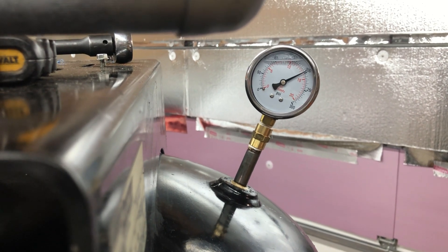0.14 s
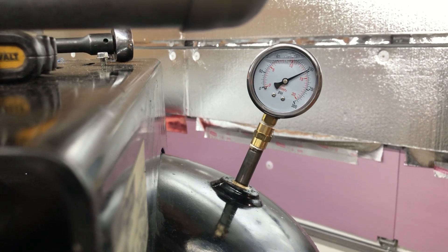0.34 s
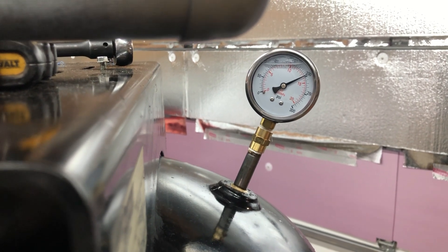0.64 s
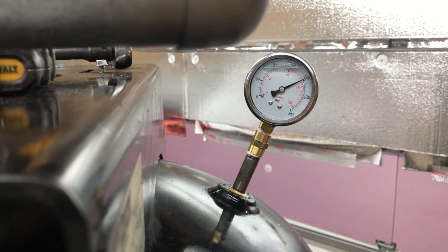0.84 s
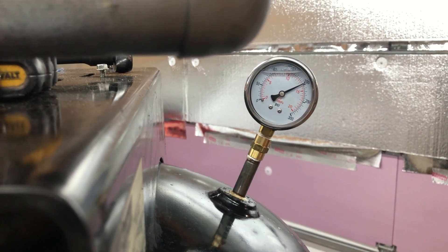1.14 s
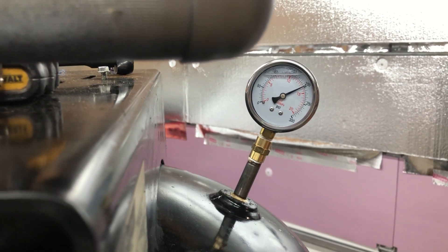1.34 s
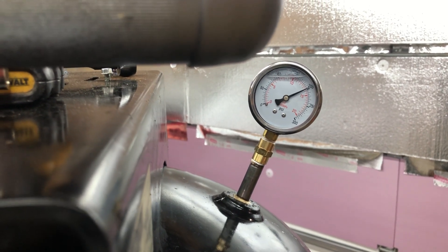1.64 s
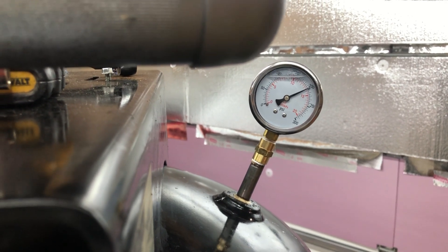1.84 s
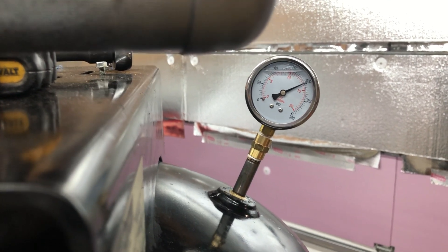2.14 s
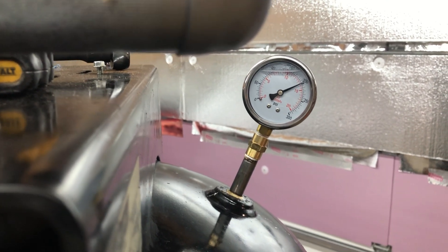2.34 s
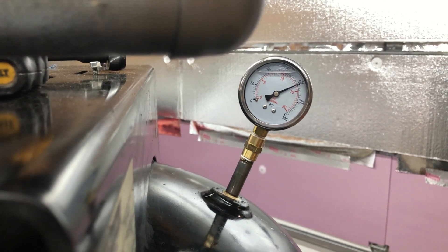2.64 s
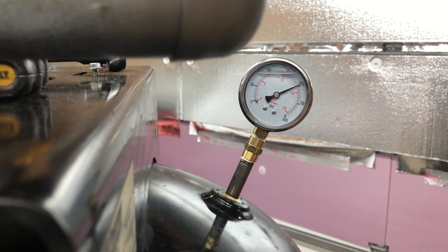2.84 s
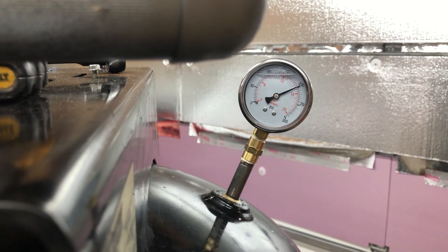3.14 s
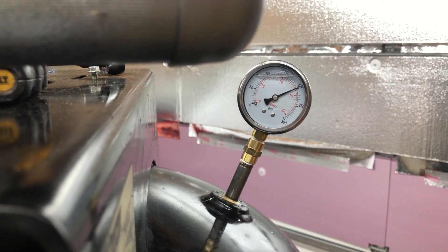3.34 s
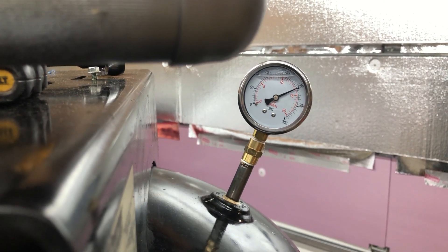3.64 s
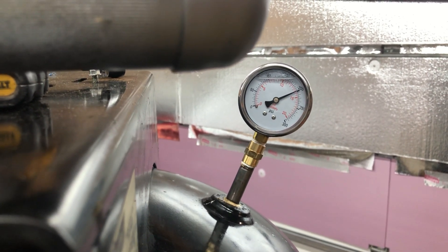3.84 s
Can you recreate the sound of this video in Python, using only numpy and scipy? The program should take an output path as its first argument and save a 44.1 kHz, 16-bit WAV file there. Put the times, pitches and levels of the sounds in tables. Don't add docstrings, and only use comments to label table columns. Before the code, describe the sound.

A cordless grease gun whines and pumps steadily, growling and clicking about every 0.6 seconds.

```python
import sys
import numpy as np
from scipy import signal
from scipy.fft import rfft, irfft
from scipy.io import wavfile
from scipy.ndimage import uniform_filter1d

SR = 44100
rng = np.random.default_rng(int(sys.argv[2]) if len(sys.argv) > 2 else 0)


def file_out(sig):
    cols = np.atleast_2d(sig).T
    lim = np.clip(cols, -1, 1)
    pcm = np.round(lim * 32767).astype(np.int16)
    wavfile.write(sys.argv[1], SR, pcm)


def undo_db(level):
    steps = np.asarray(level, float) / 20
    return 10 ** steps


N = 176400

# start in seconds, peak in dB, extra body in dB.
CLICKS = [(0.0145, -4.5, 1), (0.619, -4.5, 2), (1.2216, -4, 3), (1.8271, -4.5, -1), (2.4328, -6, 1.5),
          (3.039, -4.5, 1), (3.6453, -4.5, 1)]
STROKE_S = .606


def rms_one(x):
    return x / np.sqrt(np.mean(x ** 2) + 1e-20)


def drift(rate_hz):
    r = np.exp(-80 * np.pi * rate_hz / SR)
    slow = signal.lfilter([1], [1, -2 * r, r * r], rng.standard_normal(N // 40 + 2002))
    slow = slow[2000:]
    return np.interp(np.arange(N) / 40, np.arange(len(slow)), rms_one(slow))


def resonance(x, hz, width_hz):
    r = np.exp(-np.pi * width_hz / SR)
    feedback = [1, -2 * r * np.cos(2 * np.pi * hz / SR), r * r]
    return signal.lfilter([(1 - r * r) / 2, 0, (r * r - 1) / 2], feedback, x)


def rattle(bands, bunch):
    hits_per_s = 3500
    struck = (rng.random(N) < hits_per_s / SR) * bunch * undo_db(1.5 * drift(150.0))
    out = 0
    for hz, width_hz, db in bands:
        hits = struck * rng.standard_normal(N) + 1e-18
        once = resonance(hits, hz, width_hz * 1.3)
        out = out + undo_db(db) * rms_one(resonance(once, hz, width_hz * 1.3))
    return out


def tones(orders, turns, load, flutter_db):
    strain_flutter_db = 1.8
    out = 0
    for order, free_db, loaded_db in orders:
        db = free_db + (loaded_db - free_db) * load
        db = db + flutter_db * drift(4.0) + strain_flutter_db * load * drift(51.0)
        out = out + np.sqrt(2) * undo_db(db) * np.sin(2 * np.pi * (order * turns + rng.random()))
    return out


def engaged(load):
    return np.minimum(2.2 * load, 1)


def strokes():
    # seconds after the click, commutator whine in Hz.
    whine = [(0, 3945), (.03, 4036), (.07, 4074), (.2, 4103), (.27, 4124), (.365, 4124), (.39, 4070),
             (.47, 3750), (.51, 3690), (.55, 3730), (.606, 3945)]
    # seconds after the click, gear load 0 to 1, plunger drag 0 to 1.
    push = [(0, 0.2, .25), (.05, .0, 0.14), (.26, 0.04, 0.4), (.295, .0, 0.76), (.355, .0, 0.78),
            (.385, 0.29, 0.7), (.46, 0.85, 0.3), (0.499, 0.9, 0.47), (.55, 0.57, 0.55), (.58, 0.14, 0.82),
            (0.607, 0.34, .25)]
    battery_sag_per_s, commutator_bars = .0016, 12
    t, clicks = np.arange(N) / SR, np.array(CLICKS)[:, 0]
    clicks = np.concatenate([[clicks[0] - STROKE_S], clicks, [clicks[-1] + STROKE_S]])
    within = np.interp(t, clicks, np.arange(len(clicks))) % 1 * STROKE_S
    at, hz = np.transpose(whine)
    speed = uniform_filter1d(np.interp(within, at, hz), size=900)
    at, *forces = np.transpose(push)
    smooth = [uniform_filter1d(np.interp(within, at, force), size=500) for force in forces]
    load, drag = np.clip(smooth, 0, 1)
    shaft_hz = speed * (1 - battery_sag_per_s * (t - 1.4)) / commutator_bars
    sag = (hz.max() - speed) / np.ptp(hz)
    return np.cumsum(shaft_hz) / SR, sag, load, drag


def tank():
    # time in seconds, level in dB.
    swells = [(0.0, -39.5), (0.59, -45.5), (0.71, -37), (0.76, -53), (1.07, -33), (1.1, -44.5),
              (2.09, -44.5), (2.1, -38), (2.67, -47), (2.72, -40), (2.91, -47), (2.94, -37), (3.23, -49),
              (3.44, -39.5), (3.63, -59), (3.65, -40), (3.89, -50), (4.0, -33.5)]
    s, db = np.transpose(swells)
    hum = resonance(rng.standard_normal(N), 800.3, 13)
    hum = hum / np.sqrt(uniform_filter1d(hum ** 2, size=4000))
    return undo_db(1.5 + np.interp(np.arange(N) / SR, s, db)) * hum


def hiss(load):
    # frequency in Hz, level in dB per Hz.
    colour = [(24, -78), (40, -40), (337, -16), (422, -18.5), (1020, -17.5), (2570, -12), (4030, -9),
              (4680, -12), (16000, -24)]
    # frequency in Hz, width in Hz, change in dB.
    housing = [(1603, 405, 4.5), (3280, 1300, -5.5), (5730, 600, 3), (8070, 620, 4), (10040, 240, 1),
               (4760, 840, -3.5), (463, 410, -4.5)]
    hz = np.maximum(np.arange(N // 2 + 1) * SR / N, 1)
    colour_hz, colour_db = np.transpose(colour)
    db = np.interp(np.log(hz), np.log(colour_hz), colour_db)
    for peak_hz, width_hz, change_db in housing:
        db = db + change_db / (1 + (2 * (hz - peak_hz) / width_hz) ** 2)
    noise = rms_one(irfft(rfft(rng.standard_normal(N)) * undo_db(db), N))
    return undo_db(-24 + 2 * load + .5 * drift(11.0)) * noise


def rasp(drag):
    # frequency in Hz, width in Hz, level in dB.
    scrape = [(1613, 680, -32), (2224, 370, -29.5)]
    return drag * rattle(scrape, 1)


def sizzle(load):
    # frequency in Hz, width in Hz, level in dB.
    bearing = [(6000, 1500, -49), (10000, 1700, -36), (14500, 1500, -38), (15550, 600, -33.5)]
    return engaged(load) * rattle(bearing, 1)


def slider():
    # frequency in Hz, width in Hz, level in dB.
    metal = [(1400, 500, -15), (2200, 900, -13), (3800, 1400, -10), (6100, 1200, -16), (8500, 3000, -21)]
    slack_s, rattle_s, ring_s, click_db = .0007, .0016, .004, -8.5
    out, t = np.zeros(N), np.arange(600) / SR
    shape = np.where(t < rattle_s, 1, 0.73 * np.exp(-(t - rattle_s) / ring_s))
    for s, peak_db, body_db in CLICKS:
        burst = 0
        for hz, width_hz, band_db in metal:
            ring = resonance(rng.standard_normal(600) * shape, hz, width_hz)
            burst = burst + undo_db(band_db + body_db * (hz < 2000)) * rms_one(ring)
        i = int((s + slack_s) * SR)
        out[i:i + 600] = undo_db(peak_db + click_db) * burst
    return signal.sosfilt(signal.butter(3, 700, "high", fs=SR, output="sos"), out)


def growl(turns, load):
    # frequency in Hz, width in Hz, level in dB.
    teeth = [(325, 99, -20.5), (440, 470, -19.5), (1810, 760, -9.5), (2300, 260, -3), (2940, 290, -4),
             (3430, 320, -6.5)]
    carrier_order, pulsing = .685, .6
    bunch = 1 + pulsing * np.cos(2 * np.pi * carrier_order * turns)
    return undo_db(-24 + 0.62 * drift(22.0)) * load * rattle(teeth, bunch)


def gears(turns, load):
    # multiple of shaft speed, dB running free, dB loaded.
    side_tones = [(.75, -52, -56), (2.56, -58, -39), (7.62, -58, -34), (8.56, -56, -37), (9.565, -50, -27),
                  (11.25, -50, -32), (19.81, -60, -45), (39.63, -66, -50), (40.31, -66, -51),
                  (49.88, -66, -45)]
    # multiple of shaft speed, dB running free, dB loaded.
    mesh = [(1.19, -60, -43.5), (10.25, -39, -26), (20.5, -60, -45), (29.4, -66, -50)]
    lead_s = .022
    later_load = np.roll(load, -int(lead_s * SR))
    grip = engaged(np.minimum(load, later_load))
    return undo_db(.01) * (tones(side_tones, turns, load, 1.5) + tones(mesh, turns, grip, 1.0))


def motor(turns, sag, load, drag):
    # multiple of shaft speed, dB at full speed, dB at the bottom of the sag.
    shaft_tones = [(3, -35.5, -40), (4, -42, -55), (9, -37, -40), (12, -22.3, -33), (13, -40, -44),
                   (15, -39.5, -55), (22, -44, -55), (23, -47, -58), (24, -32, -44), (25, -35, -52),
                   (26, -54, -48), (27, -44, -55), (30, -50, -50), (31, -50, -60), (33, -49, -51),
                   (34, -51, -60), (35, -50, -60), (36, -41, -51), (37, -43.5, -57), (48, -60, -49)]
    strain = sag * (0.67 + 0.29 * engaged(load))
    whine = undo_db(.01) * tones(shaft_tones, turns, strain, 1.0)
    unbalance_db = -41 + 4 * drag + 0.4 * drift(6.7)
    return whine + np.sqrt(2) * undo_db(unbalance_db) * np.sin(2 * np.pi * turns)


def scene():
    turns, sag, load, drag = strokes()
    mix = tank() + hiss(load) + rasp(drag) + sizzle(load) + slider()
    mix = mix + growl(turns, load) + gears(turns, load) + motor(turns, sag, load, drag)
    return np.tile(mix, (2, 1))


def wide_patches(x):
    # middle in seconds, length in seconds, lowest Hz, highest Hz.
    patches = [(0.31, 0.036, 4651, 6976), (0.403, 0.03, 13781, 15159), (0.472, 0.032, 12316, 13781),
               (0.563, 0.032, 13092, 14470), (0.564, 0.033, 8957, 11025), (0.565, 0.035, 5081, 6287),
               (0.842, 0.028, 13781, 15762), (0.843, 0.035, 8182, 9646), (1.03, 0.083, 8182, 9733),
               (1.144, 0.029, 11800, 13092), (1.145, 0.035, 14470, 15848), (1.285, 0.033, 10335, 12403),
               (1.401, 0.036, 5684, 7665), (1.447, 0.038, 5598, 7579), (1.655, 0.036, 6201, 7665),
               (1.657, 0.03, 11714, 13092), (2.028, 0.03, 14556, 15848), (2.028, 0.036, 5167, 6373),
               (2.074, 0.032, 8957, 11025), (2.467, 0.032, 9646, 11714), (2.539, 0.03, 10335, 11714),
               (2.956, 0.032, 13006, 14384), (2.956, 0.035, 6287, 7665), (3.791, 0.036, 6287, 7665)]
    out = x.copy()
    for s, length_s, low_hz, high_hz in patches:
        size = int((length_s + .012) * SR)
        i = int(s * SR) - size // 2
        hz = np.arange(size // 2 + 1) * SR / size
        band = (hz > low_hz + 60) & (hz < high_hz - 60)
        own = irfft(rfft(x[0, i:i + size]) * band, size)
        noise = rms_one(irfft(rfft(rng.standard_normal(size)) * band, size)) * own.std()
        change = undo_db(1) * noise * [[.7], [-.7]] - .3 * own
        out[:, i:i + size] += np.hanning(size) ** .8 * change
    return out


def roll_off(x):
    return signal.sosfilt(signal.butter(12, 16810, fs=SR, output="sos"), x)


def record(dry):
    below_cutoff = np.arange(N // 2 + 1) * SR / N < 15790
    mix = irfft(rfft(wide_patches(dry)) * below_cutoff, N)
    return roll_off(mix)


dry = scene()
out = record(dry)
file_out(out)
```